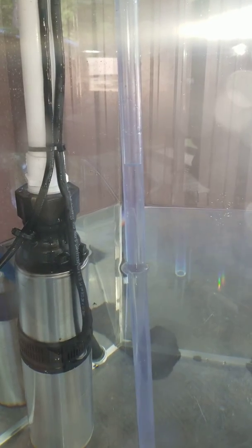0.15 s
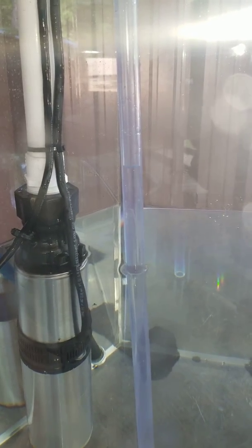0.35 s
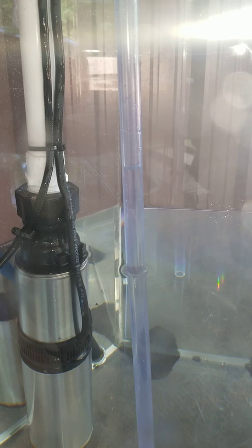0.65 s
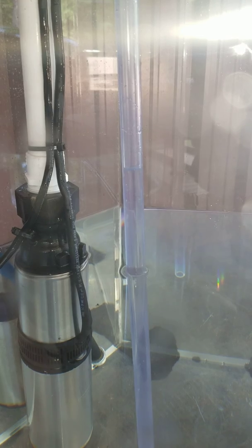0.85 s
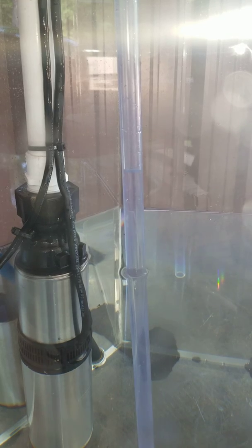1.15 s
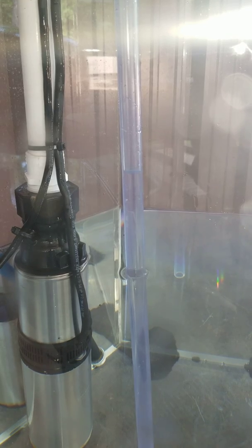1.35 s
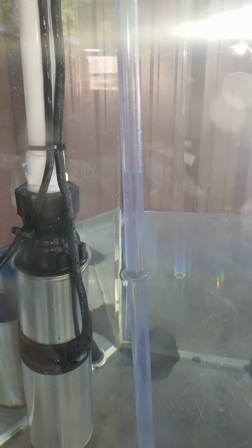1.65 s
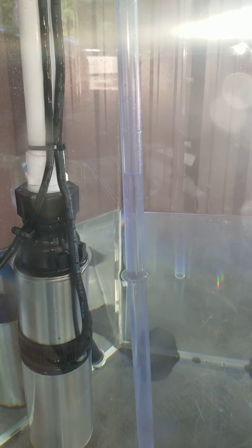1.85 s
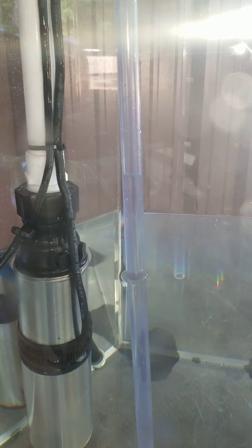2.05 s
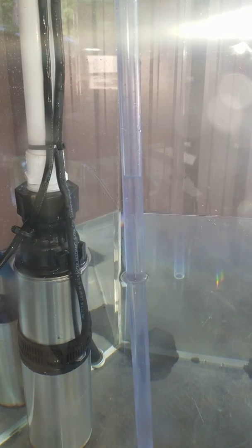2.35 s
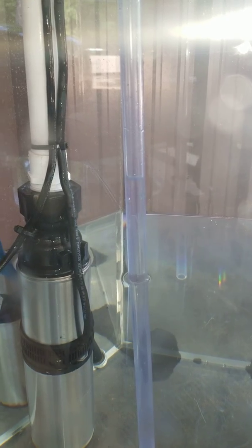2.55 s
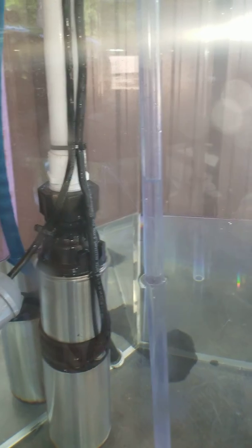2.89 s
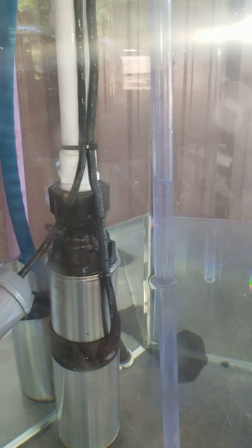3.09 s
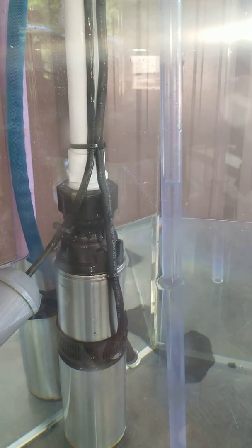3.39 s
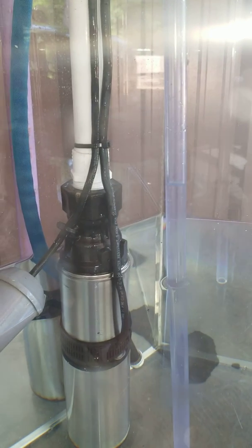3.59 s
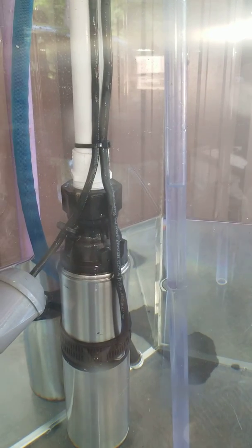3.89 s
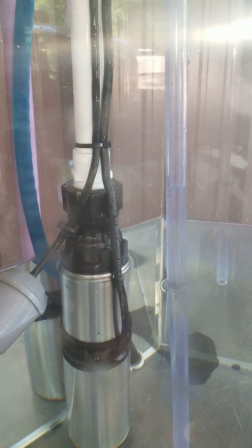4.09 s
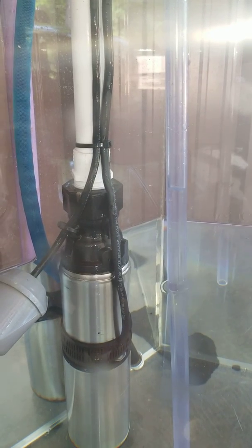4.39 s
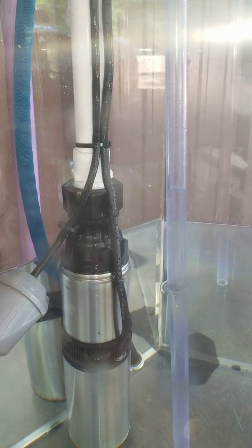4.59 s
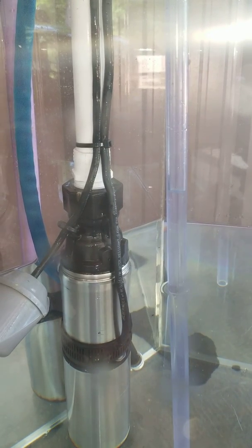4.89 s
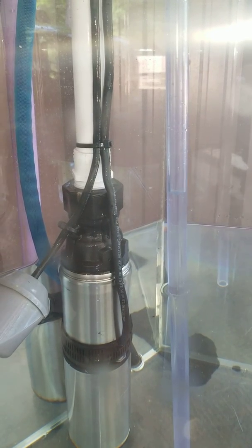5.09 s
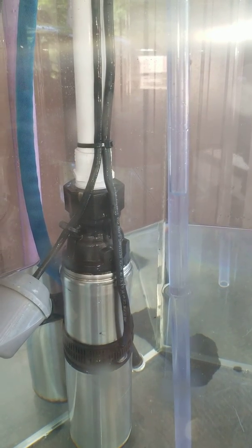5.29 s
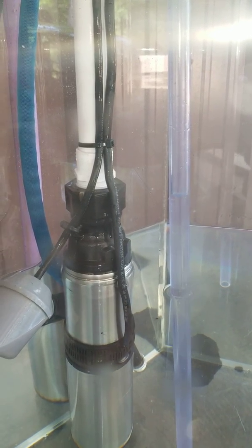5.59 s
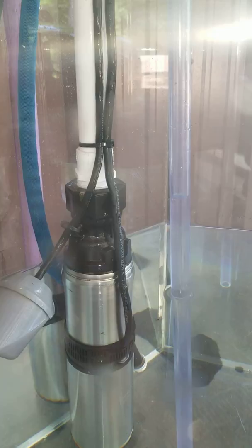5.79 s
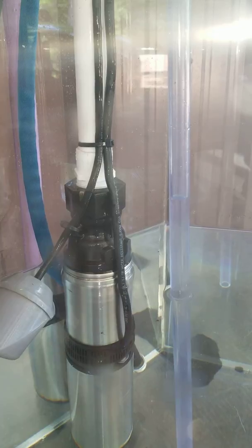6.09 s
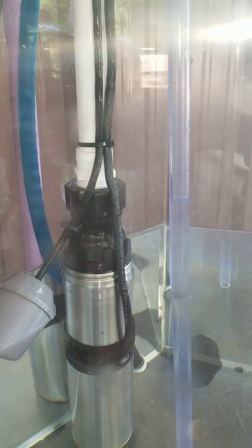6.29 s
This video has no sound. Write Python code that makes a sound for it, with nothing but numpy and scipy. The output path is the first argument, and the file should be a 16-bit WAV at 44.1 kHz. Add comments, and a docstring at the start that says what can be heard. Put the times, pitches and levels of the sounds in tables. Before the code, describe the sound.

A submersible pump runs without pause in a tank of water, heard close in stereo. A strong low hum, with a slow throb and buzzing overtones, sits under a steady watery rush and fine fizz. The level starts subdued and rises within half a second. Sharp bubble pops come at half a second and again past four seconds; midway the tone shifts slightly.

```python
"""A submersible pump in a water tank, close to a pair of microphones; the level starts subdued and rises at once.
The motor hums at twice the mains rate; its shaft slips a little behind the field, so the side tones throb.
Water rushes through impeller and pipe, rings the tank, moans in the pipe and fizzes with small bubbles.
A few bubbles pop sharply, from half a second on; halfway, the microphones step aside and the balance shifts.
All along the water falls, so the hum slowly grows, the rotor barely grows, and the fizz fades a little."""
import sys
import numpy as np
from scipy import signal
from scipy.fft import rfft, irfft, next_fast_len
from scipy.io import wavfile
from scipy.ndimage import uniform_filter1d

SR = 44100
rng = np.random.default_rng(int(sys.argv[2]) if len(sys.argv) > 2 else 0)


def inscribe(sig):
    """Save sig as 16-bit PCM at rate SR to the path in sys.argv[1].

    A 1-D sig is mono; a 2-D sig holds one channel per row.
    Samples are clipped to [-1, 1] before scaling.
    """
    pcm = np.round(np.clip(np.atleast_2d(sig).T, -1, 1) * 32767)
    wavfile.write(sys.argv[1], SR, pcm.astype(np.int16))


N = 284445
T = np.arange(N) / SR  # seconds

MAINS_HZ, SHAFT_HZ = 59.995, 57.33
# level trends as the water falls; the flow itself stays steady
HUM_DB_PER_S, ROTOR_DB_PER_S, FIZZ_DB_PER_S = 0.36, 0.08, -0.4
# the microphones' step aside: the rotor comes forward, the hollow middle band and the moan recede
MOVE_AT_S, MOVE_LENGTH_S = 2.9, 0.3
ROTOR_MOVE_DB, HOLLOW_MOVE_DB, MOAN_MOVE_DB = 1.2, -1.2, -4


def amp(db):
    """Decibels to amplitude gain: 20 dB is a factor of ten."""
    return 10 ** (np.asarray(db) / 20)


def unit(x):
    """Normalisation to a root-mean-square of 1."""
    return x / np.sqrt(np.mean(x ** 2) + 1e-20)


def read(points, hz, axis=1):
    """Interpolation of one column of a spectrum table along a logarithmic frequency axis."""
    table = np.transpose(points)
    return np.interp(np.log(hz + 1), np.log(table[0] + 1), table[axis])


def pan(balance_db):
    """Interchannel level difference: left and right gains as a column, half the difference each."""
    return amp(np.array([[0.5], [-0.5]]) * balance_db)


def bell(hz, centre_hz, width_hz):
    """Gaussian band of height 1 with half its width at half height on each side."""
    return 0.5 ** ((2 * (hz - centre_hz) / width_hz) ** 2)


def wander(rate_hz):
    """Low-pass noise: a slow random modulation of rms 1, up to about the given rate."""
    step = 100  # samples between slow values
    hz = np.fft.rfftfreq(N // step, step / SR)
    spectrum = rfft(rng.standard_normal(N // step))
    slow = irfft(spectrum / (1 + (hz / rate_hz) ** 2))
    return unit(np.interp(T, np.linspace(0, T[-1], len(slow)), slow))


def draining_db(db_per_s):
    """Exponential growth or decay: a steady dB rate as the water falls, 0 dB halfway through."""
    return db_per_s * (T - T[-1] / 2)


def moved(t):
    """Linear progress of the microphones' step aside, from -1/2 before it to +1/2 after it."""
    return np.clip((t - MOVE_AT_S) / MOVE_LENGTH_S, -0.5, 0.5)


def fade_in(start_db=-7, from_s=0.14, length_s=0.47):
    """Linear amplitude ramp: the level starts subdued and rises over the first half second or so."""
    risen = np.clip((T - from_s) / length_s, 0, 1)
    return amp(start_db) * (1 - risen) + risen


def hum(flutter=0.017, flutter_hz=14, trim_db=0.74):
    """Magnetic attraction: the field squeezes the stator twice a mains cycle; upper overtones flutter more."""
    # Overtones of the hum. Each row: multiple of twice the mains rate, level in dB before the trim,
    # left-right level difference in dB, lead of the left microphone in radians.
    overtones = [(1, -27, 6, -1.09), (2, -53.5, 12.5, 1.8), (3, -41.5, 8, 0.68), (5, -42.5, 5.5, 0.73),
                 (6, -57.5, 8, 0.5), (7, -47, 9, 1.4)]
    out = np.zeros((2, N))
    for multiple, db, balance_db, lead in overtones:
        angle = 2 * np.pi * (multiple * 2 * MAINS_HZ * T + rng.random())
        tone = np.sin(angle + np.array([[0.5], [-0.5]]) * lead)
        tone *= 1 + flutter * multiple * wander(flutter_hz)
        # the falling water muffles the fundamental less and less; the overtones follow no trend
        growth_db = draining_db(HUM_DB_PER_S) if multiple == 1 else 0
        out += amp(db + trim_db + growth_db) * pan(balance_db) * tone
    return out


def rotor(throb_multiple=5, throb_at_s=3.312, wobble_turns=0.0078, wobble_hz=4, trim_db=0.3):
    """Beating: slip detunes the shaft's side tones; those near one mains multiple align twice per slipped turn."""
    # Shaft orders and side tones. Each row: shaft order, added multiples of twice the mains rate,
    # level in dB before trim and trends, left-right level difference in dB.
    side_tones = [(1, 0, -55.5, 4), (2, 0, -53.5, 5), (3, 0, -46, -5), (4, 0, -54.5, 13.5), (5, 0, -46, 1),
                  (6, 0, -64, 13), (7, 0, -55, 6), (8, 0, -56.5, -7), (11, 0, -69, -4), (12, 0, -58.5, -1),
                  (14, 0, -71, 9), (16, 0, -59.5, 10), (17, 0, -59.5, 3), (18, 0, -59.5, 6),
                  (19, 0, -60.5, 9), (20, 0, -60.5, 8), (21, 0, -57.5, 4), (22, 0, -60.5, -4),
                  (23, 0, -72, 0), (1, 1, -56.5, -7), (3, 1, -60.5, 26.5), (-1, 2, -57, -11),
                  (1, 2, -42, 4), (3, 2, -58, -3), (1, 3, -58.5, 13.5), (-4, 3, -71, 7), (7, -1, -58.5, 6),
                  (2, 1, -61, 0), (-4, 4, -60.5, 14), (4, 4, -55.5, -2), (-1, 6, -59, -2), (1, 6, -58, 12)]
    # turns of the shaft relative to the field, counted from a peak of the throb
    slipped = (SHAFT_HZ - MAINS_HZ) * (T - throb_at_s) + wobble_turns * wander(wobble_hz)
    out = np.zeros((2, N))
    for order, multiple, db, balance_db in side_tones:
        nearest = order + 2 * multiple  # mains multiple that the tone would have without slip
        offset = rng.random() * (nearest != throb_multiple)  # turns; the throbbing tones share phase 0
        angle = 2 * np.pi * (nearest * MAINS_HZ * T + order * slipped + offset)
        out += amp(db) * pan(balance_db) * np.sin(angle)
    return out * amp(trim_db + draining_db(ROTOR_DB_PER_S) + ROTOR_MOVE_DB * moved(T))


def turbulence(patchy_db=0.75, flicker_db=0.28, hollow_hz=2200, hollow_width_hz=1200):
    """Turbulent broadband noise in drifting patches, partly coherent between the two microphones."""
    # Coherence. Each row: frequency in Hz, likeness of left and right from 0 to 1.
    likeness = [(60, 1), (170, 0.47), (235, .2), (300, 0.44), (500, 0.58), (800, 0.87), (1200, 0.61),
                (1900, 0.54), (2600, 0.29), (4000, 0.32), (7000, 0.091), (12500, .28)]
    # Interchannel phase. Each row: frequency in Hz, lead of the left microphone in radians.
    left_lead = [(100, -.5), (600, 0.24), (950, 2), (1700, 2), (1950, -1.1), (3100, -2.5), (4500, 0.35),
                 (5300, 3.5), (9000, 3), (15000, 6.5)]
    window, hop = 1024, 256  # samples
    hz = np.fft.rfftfreq(window, 1 / SR)
    frames = N // hop + 5
    t = np.arange(frames)[:, None] * hop / SR

    a, b, c, d, patches = rng.standard_normal((5, frames, len(hz)))
    patches = uniform_filter1d(patches, size=9, axis=0)  # smooth in time
    patches = unit(uniform_filter1d(patches, size=6, axis=1))  # smooth in frequency
    flicker = unit(uniform_filter1d(rng.standard_normal((frames, 1)), size=5, axis=0))

    same = read(likeness, hz)
    left = a + 1j * b
    right = same * left + np.sqrt(1 - same ** 2) * (c + 1j * d)
    right = right * np.exp(-1j * read(left_lead, hz))

    hollow_db = HOLLOW_MOVE_DB * moved(t) * bell(hz, hollow_hz, hollow_width_hz)
    gain = amp(hollow_db + patchy_db * patches + flicker_db * flicker)
    spectra = np.array([left, right]) * gain
    flow = signal.istft(spectra.transpose(0, 2, 1), nperseg=window, noverlap=window - hop)[1]
    return unit(flow[:, :N])


def fizz(per_s=700, spread_db=3.5, low_hz=7000, level_db=-11, clump_db=4.5, clump_hz=5):
    """Shot noise: tiny bubbles burst at random, in loose clumps and in sizes that vary widely."""
    size = amp(spread_db * np.minimum(rng.exponential(1, (2, N)), 4))
    size = size * rng.choice([-1, 1], (2, N))
    bursts = size * (rng.random((2, N)) < per_s / SR)
    high_pass = signal.butter(2, low_hz, "high", fs=SR, output="sos")
    bright = unit(signal.sosfilt(high_pass, bursts))
    return bright * amp(level_db + clump_db * wander(clump_hz) + draining_db(FIZZ_DB_PER_S))


def water_colour(hz):
    """Resonance and interference: tank modes raise the flow's spectrum, a reflection cuts it."""
    # Spectrum of the rush. Each row: frequency in Hz, left and right level in dB per Hz before the trim.
    rush = [(20, -90, -92), (48, -84, -84), (85, -72.5, -70), (137, -63.5, -66), (212, -74, -73.5),
            (550, -73.5, -77), (1290, -72.5, -76.5), (1700, -69, -81), (2540, -69, -75.5),
            (3650, -69.5, -77), (5200, -75.5, -78.5), (7100, -78, -82), (8820, -89, -87.5),
            (15800, -89, -90)]
    # Resonances of tank and pipe. Each row: frequency in Hz, width in Hz, left and right rise in dB.
    resonances = [(78, 15, 4, 6), (271, 63, 8, 4.5), (828, 170, 9, 4.5), (1017, 99, 7, 5.5),
                  (1506, 74, 4, 4), (1873, 140, 5, -7), (1980, 65, 3.5, 12.5), (2370, 94, 4.5, -1),
                  (2723, 300, 5, 2.5), (3034, 320, 5, 3.5), (4390, 640, 2, 2), (10320, 2100, 6, 9.5),
                  (12800, 1720, 12, 12)]
    # Bands cancelled by a reflection, left microphone then right.
    # Each row: frequency in Hz, width in Hz, depth in dB.
    cancelled = [(8420, 1050, 7.5), (7860, 710, 19)]
    db = np.array([read(rush, hz, axis=1), read(rush, hz, axis=2)])
    for centre_hz, width_hz, left_db, right_db in resonances:
        db += np.outer([left_db, right_db], bell(hz, centre_hz, width_hz))
    for side, (centre_hz, width_hz, depth_db) in enumerate(cancelled):
        db[side] -= depth_db * bell(hz, centre_hz, width_hz)
    return amp(db)


def standing_waves(hz, ripple_db=1.4, ripple_radians=0.57, spacing_hz=55, from_hz=900):
    """Wall reflections interfere: level and phase ripple along frequency, differently at each microphone."""
    knots = rng.standard_normal((4, 2000))
    ripple = np.array([np.interp(hz / spacing_hz, np.arange(len(k)), k) for k in knots])
    ripple *= hz / (hz + from_hz)  # weak in the bass
    return amp(ripple_db * ripple[:2]) * np.exp(1j * ripple_radians * ripple[2:])


def water(shaft_pulsing=0.03, hum_pulsing=0.018, trim_db=0.08):
    """Source and filter: flow, pulsing with each shaft turn and with the hum, sounds with fizz through the tank."""
    shake = 1 + shaft_pulsing * np.cos(2 * np.pi * SHAFT_HZ * T)
    shake += hum_pulsing * np.cos(2 * np.pi * 2 * MAINS_HZ * T)
    drive = turbulence() * shake + fizz()
    drive *= np.sqrt(SR / 2)  # brings the flow to power 1 per Hz
    size = next_fast_len(N)
    hz = np.fft.rfftfreq(size, 1 / SR)
    filtered = rfft(drive, size) * water_colour(hz) * standing_waves(hz)
    return amp(trim_db) * irfft(filtered, size)[:, :N]


def moan(centre_hz=1930, drift_hz=50, drift_rate_hz=4, width_hz=35, level_db=-54.5, balance_db=5):
    """Flow-excited resonance: noise rings one narrow mode of the pipe, whose pitch drifts."""
    keep = np.exp(-np.pi * width_hz / SR)  # decay of each of two equal poles per sample
    noise = rng.standard_normal(N) + 1j * rng.standard_normal(N)
    ring = signal.lfilter([1], np.poly([keep, keep]), noise)
    pitch_hz = centre_hz + drift_hz * wander(drift_rate_hz)
    angle = 2 * np.pi * np.cumsum(pitch_hz) / SR
    tone = unit((ring * np.exp(1j * angle)).real)  # shifts the ringing up to the drifting pitch
    return amp(level_db + MOAN_MOVE_DB * moved(T)) * pan(balance_db) * tone


def pops(splash=0.38):
    """Impulsive radiation: a larger bubble bursts with one sharp snap and a very short decaying spray."""
    # Bursting bubbles. Each row: time of the snap in seconds, peak level in dB before panning,
    # left-right level difference in dB, decay time of the spray in seconds.
    bubbles = [(.5024, -19, 17, 0.00045), (0.5048, -14, 3, .0014), (2.9915, -25, 3, .0008),
               (4.1313, -19, 17, .0004), (4.1338, -19, 16, .0005), (4.1405, -30.5, 14, .0005)]
    # Colour of a pop. Each row: frequency in Hz, relative level in dB.
    pop_spectrum = [(1000, -28), (5500, -13), (8200, -8), (10500, -3), (13000, 1), (16000, 0)]
    size, lead_in = 512, 20  # samples; the lead-in leaves room for the filter's ringing ahead of the snap
    hz = np.fft.rfftfreq(size, 1 / SR)
    out = np.zeros((2, N))
    for snap_s, db, balance_db, decay_s in bubbles:
        spray = splash * rng.standard_normal((2, size)) * np.exp(-T[:size] / decay_s)
        snap = T[:size] == 0
        burst = np.roll(spray + snap, lead_in, axis=1)
        burst = irfft(rfft(burst) * amp(read(pop_spectrum, hz)))
        burst /= abs(burst).max()
        start = round(snap_s * SR) - lead_in
        out[:, start:start + size] += amp(db) * pan(balance_db) * burst
    return out


def scene():
    """Superposition: motor and water share one fade-in of level, and single pops stand out."""
    return fade_in() * (hum() + rotor() + water() + moan()) + pops()


def record(dry, cutoff_hz=15800):
    """Band limiting: the recorder's linear-phase low-pass filter."""
    taps = signal.firwin(1023, cutoff_hz, window=("kaiser", 9), fs=SR)
    return signal.oaconvolve(dry, taps[None], "same", axes=1)


dry = scene()
out = record(dry)
inscribe(out)
```